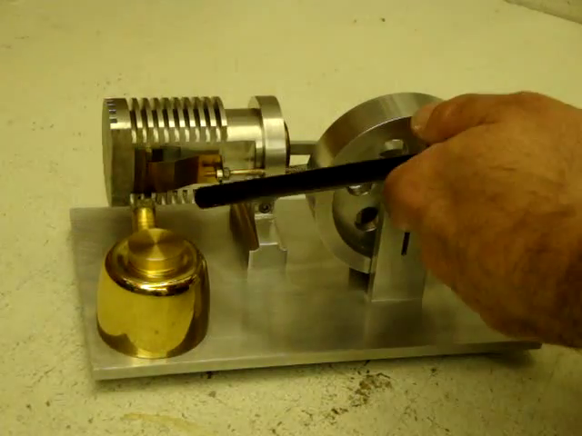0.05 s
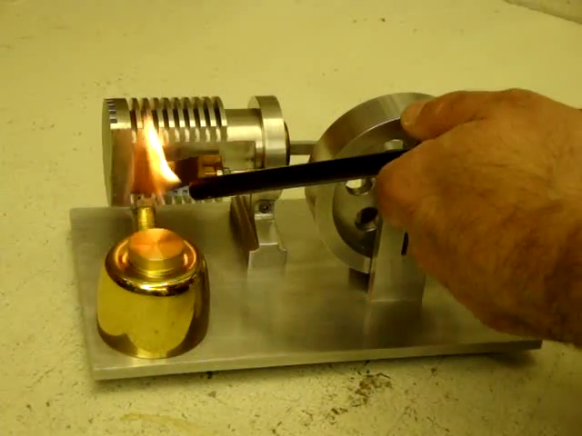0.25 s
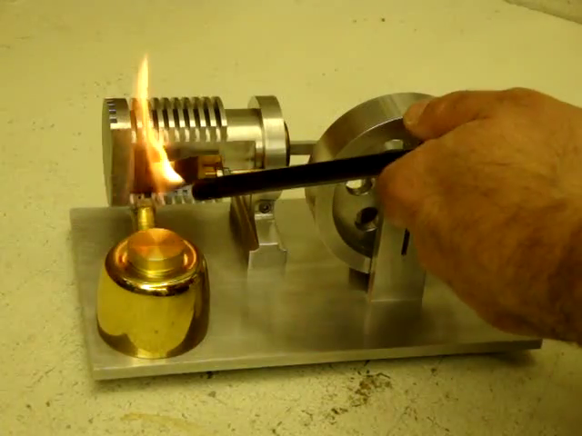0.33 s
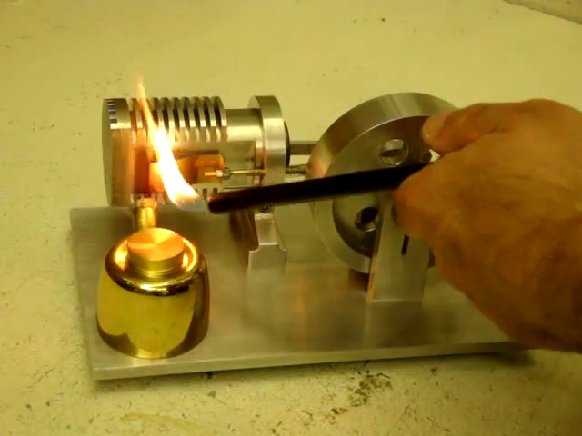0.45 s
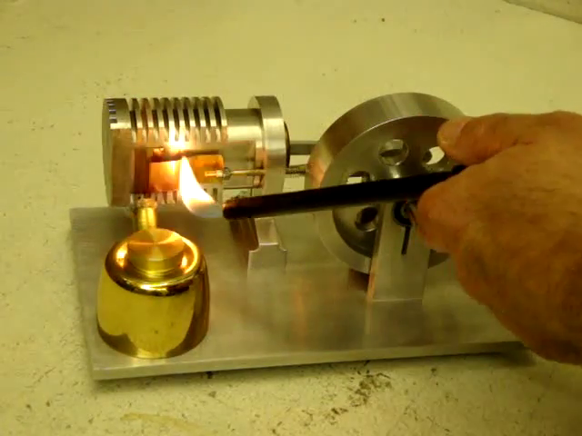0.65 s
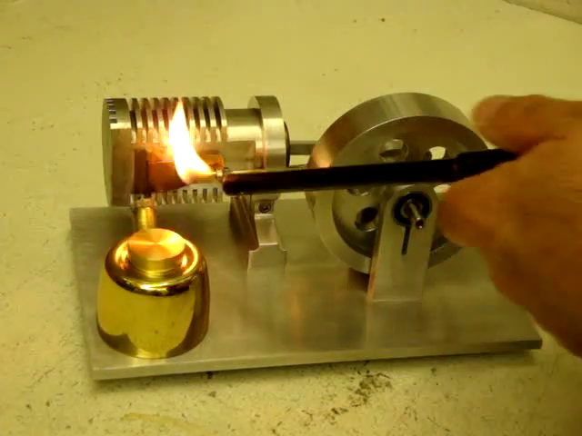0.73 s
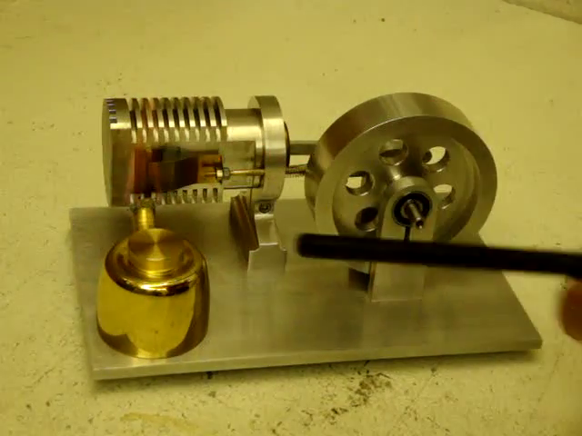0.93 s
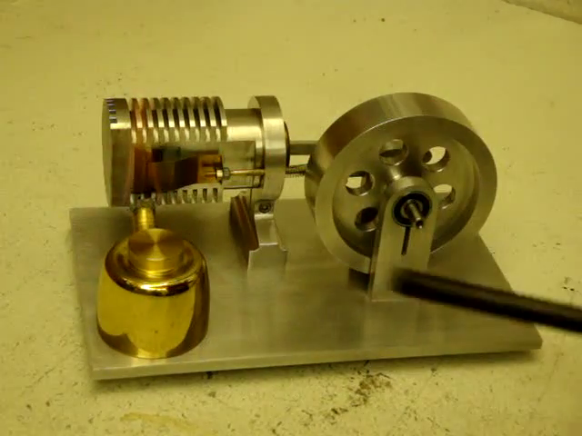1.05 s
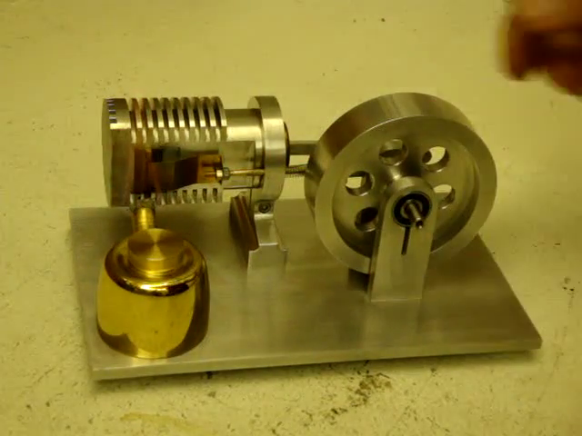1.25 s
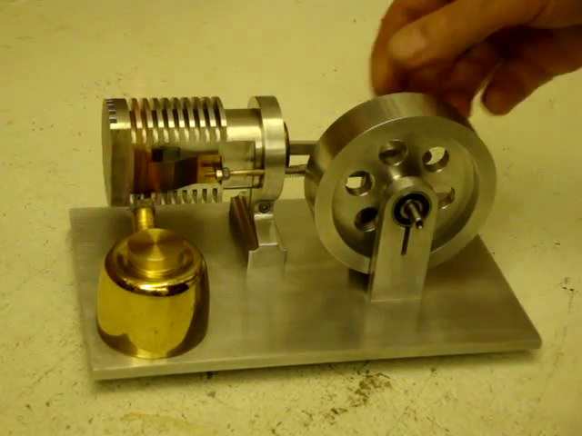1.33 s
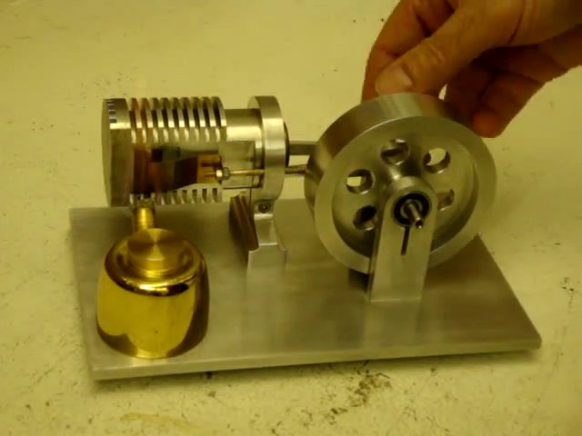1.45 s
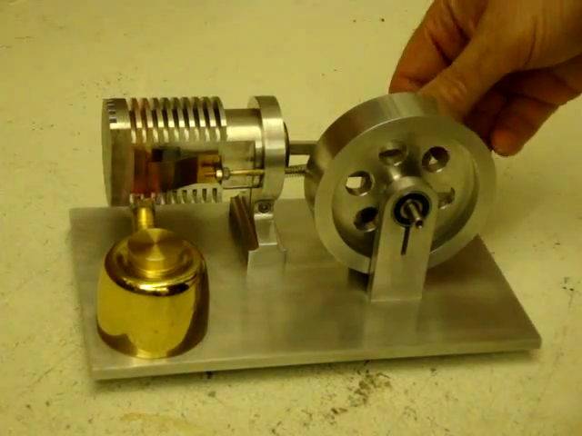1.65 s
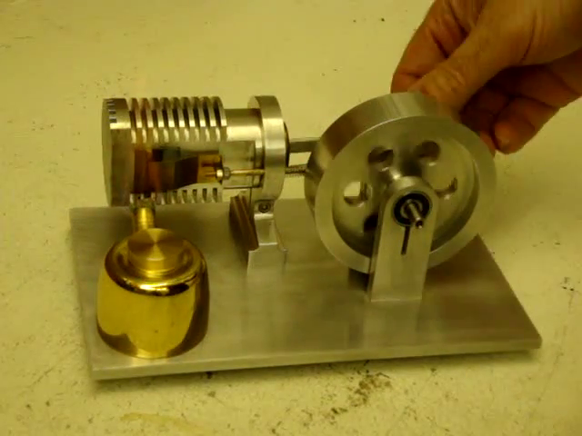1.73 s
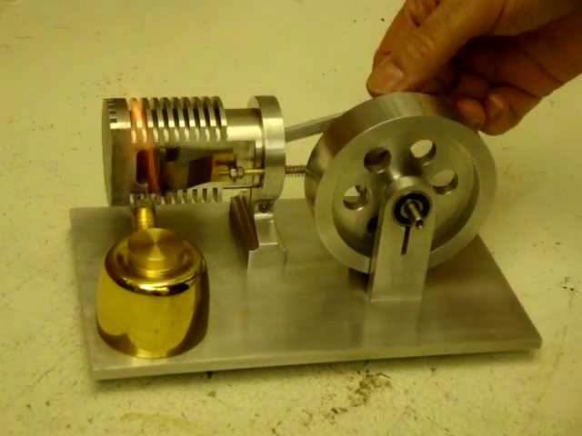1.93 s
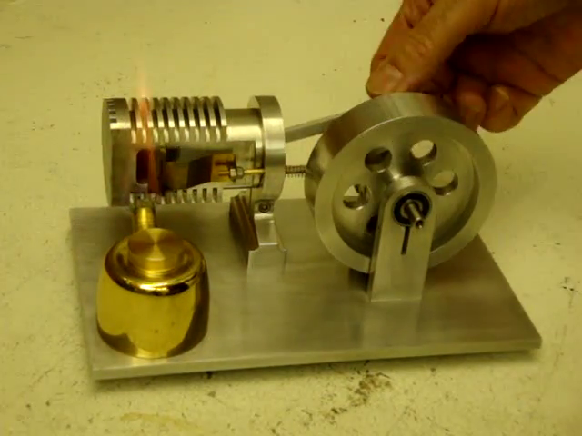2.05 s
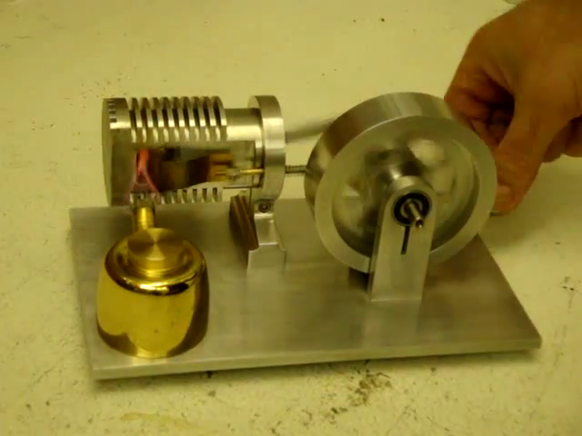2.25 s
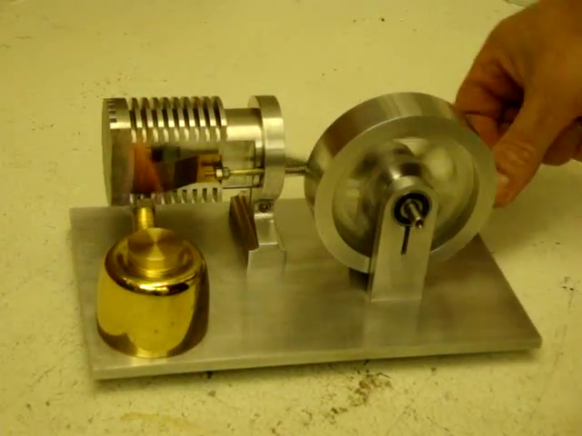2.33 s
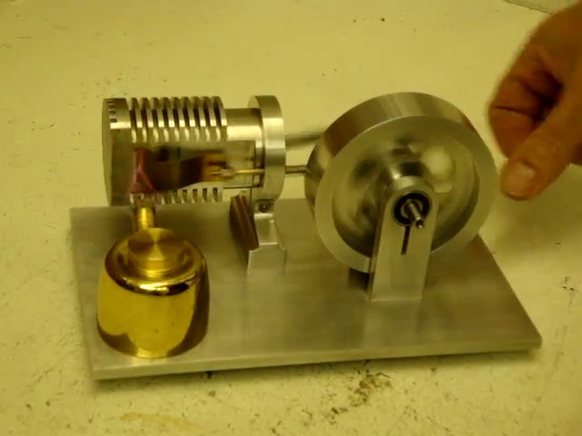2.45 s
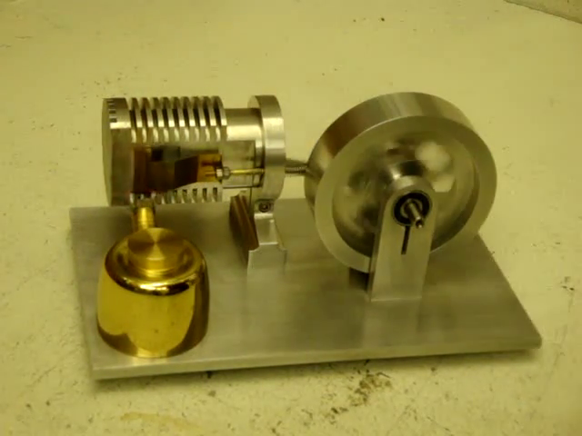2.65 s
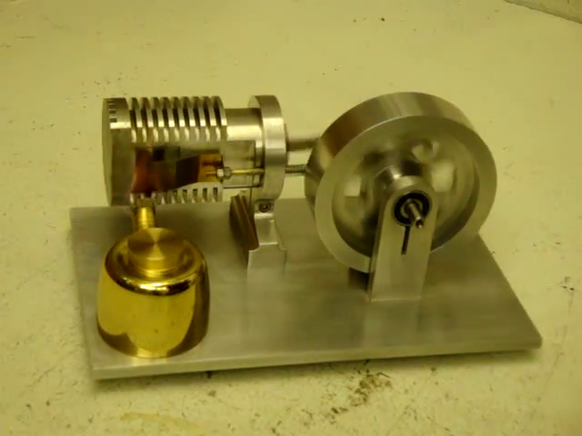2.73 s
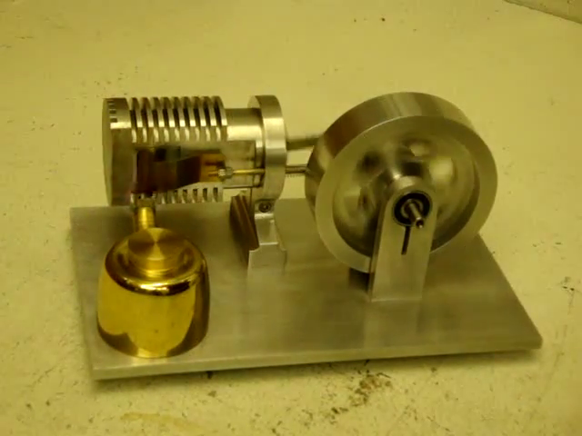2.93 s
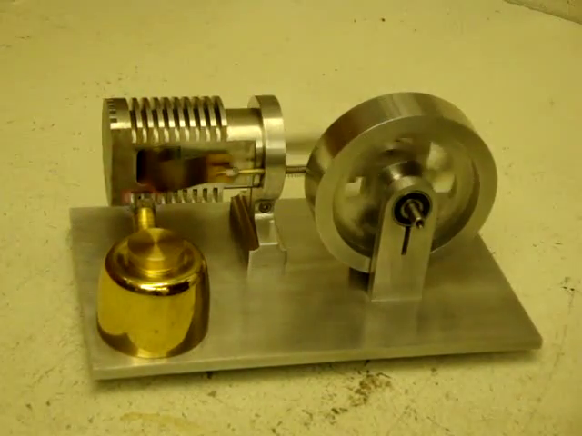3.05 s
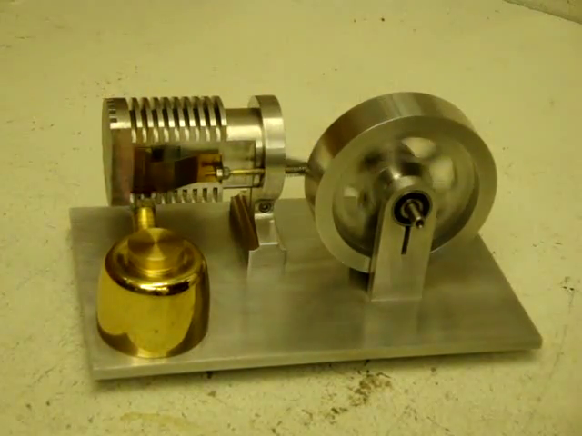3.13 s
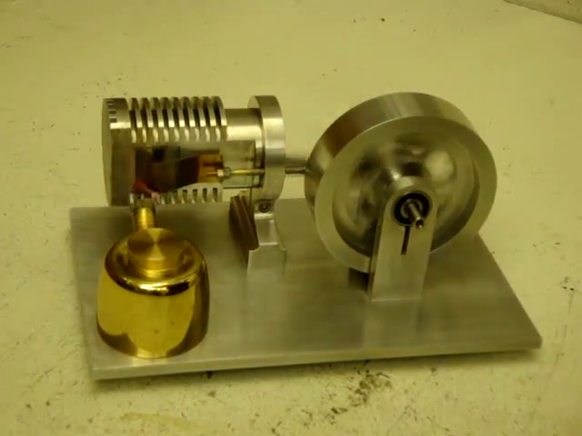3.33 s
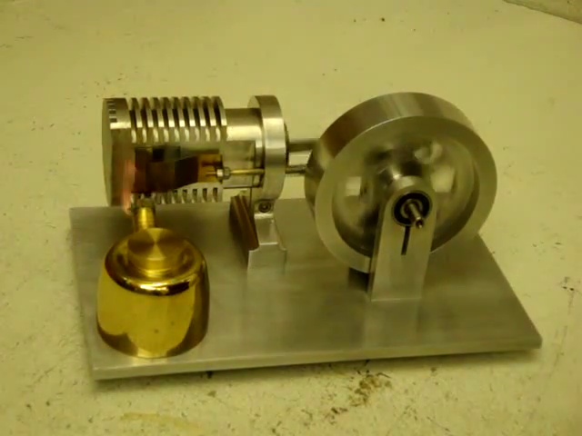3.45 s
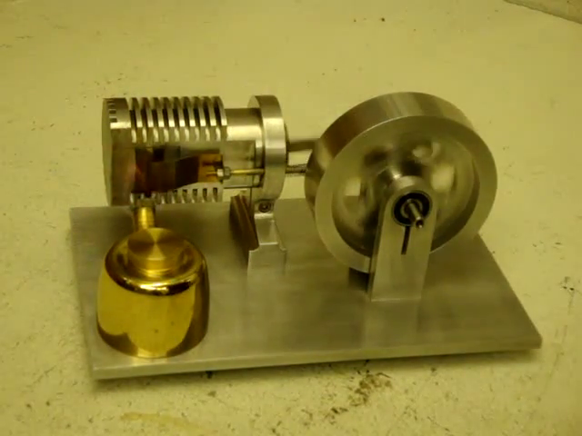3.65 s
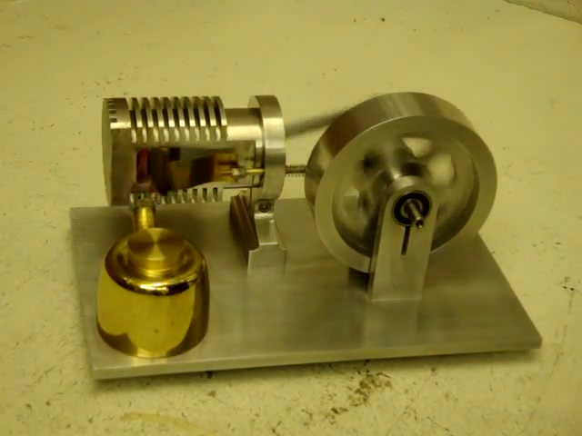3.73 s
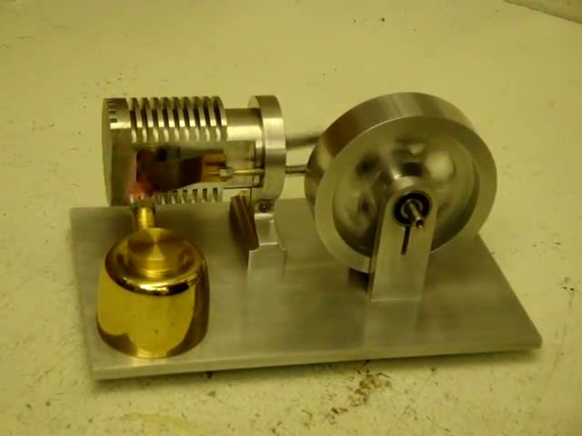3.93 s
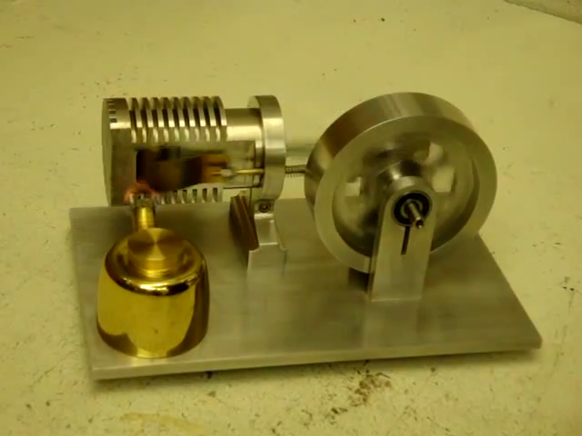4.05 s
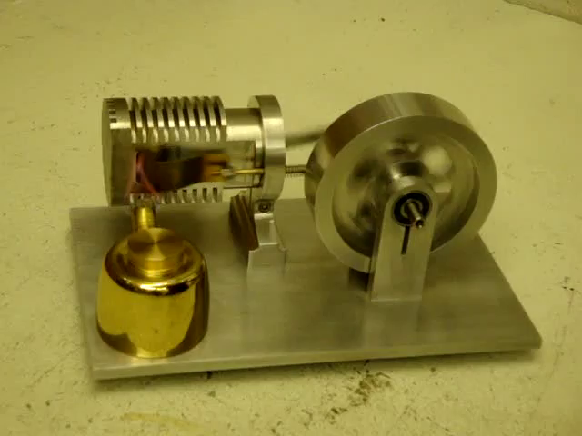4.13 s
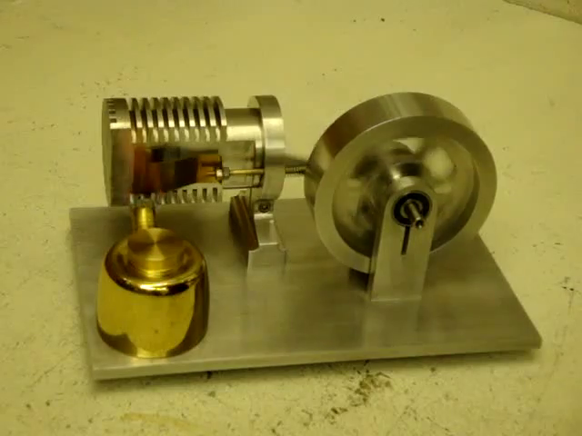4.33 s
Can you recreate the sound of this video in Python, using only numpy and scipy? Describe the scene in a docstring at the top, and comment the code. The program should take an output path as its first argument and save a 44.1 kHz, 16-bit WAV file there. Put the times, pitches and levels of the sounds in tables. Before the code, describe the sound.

In a small workshop, a lighter snaps once amid tiny clicks, then its casing rattles faintly. After a quiet gap, fingers rock a metal flywheel with small ticks and bumps, then flick it. The model engine catches and knocks quickly and steadily, about six times a second, with slides and ticks between knocks. Close mono microphone, dry room, soft treble limit.

```python
"""On a workbench in a small workshop, a lighter snaps and lights the burner of a flame-licker model engine.
Fingers rock the flywheel and flick it; the engine catches and runs at nearly six turns a second.
Every turn plays one chain: valve knock, spring ring, piston slide, linkage ticks, return stroke.
Each contact is a burst of metallic micro-impacts sent through the resonances of the part it strikes.
Quiet room noise and a faint steady hum lie underneath."""
import sys
import numpy as np
from scipy import signal
from scipy.fft import rfft, irfft
from scipy.io import wavfile
from scipy.ndimage import uniform_filter1d

SR = 44100
rng = np.random.default_rng(int(sys.argv[2]) if len(sys.argv) > 2 else 0)


def file_out(sig):
    """Save sig as 16-bit WAV at sys.argv[1]."""
    # one column per channel
    cols = np.atleast_2d(sig).T
    # limit, then scale
    lim = np.clip(cols, -1, 1)
    pcm = np.round(lim * 32767).astype(np.int16)
    wavfile.write(sys.argv[1], SR, pcm)


N = 277830

# quiet workshop air, spectrum shape: (frequency [Hz], relative density [dB per Hz])
AIR_SPECTRUM = [(15, -76.5), (25, -24), (92, -20), (172, -19), (200, -15), (257, -16), (339, -12),
                (458, -12.5), (588, -13), (701, -13), (996, -11), (1100, -16), (10000, -20.5), (13000, -69),
                (22000, -120)]
# faint steady hum: (frequency [Hz], level [dB])
HUM_TONES = [(602, -66.5)]

# trigger, igniter and release of the lighter: (time [s], drive [dB], decay [s])
LIGHTER_CLICKS = [(.062, -37, 0.006), (.069, -35, 0.0051), (.0995, -16, 0.03), (.113, -20, 0.05),
                  (.126, -22.5, 0.027), (.496, -45, 0.0098), (.759, -33.5, 0.0025), (.784, -43.5, 0.0082),
                  (.81, -43, 0.012), (.843, -45.5, 0.025)]
# the lighter's casing rubbing and rattling as it is drawn back: (time [s], drive [dB], decay [s])
CASING_RATTLES = [(.503, -53, 0.011), (.72, -58, 0.072), (.768, -52, 0.16), (.852, -47, 0.014),
                  (.8635, -31, 0.024), (.876, -33.5, 0.019), (.981, -51, 0.027), (.999, -49.5, 0.02)]
# the valve gear clicking as fingers move the wheel: (time [s], drive [dB], decay [s])
GEAR_CLICKS = [(1.773, -44.5, 0.0078), (1.792, -52, 0.003), (1.808, -30.5, 0.0079), (1.824, -44, 0.037),
               (2.200, -33, 0.0034), (2.224, -30, 0.041), (2.282, -47, .003)]
# the flywheel's stand groaning as the wheel is rocked: (time [s], drive [dB], decay [s])
STAND_GROANS = [(1.815, -53.5, .03)]
# fingers bumping the engine on the bench: (time [s], drive [dB], decay [s])
BENCH_BUMPS = [(1.43, -59, 0.051), (1.78, -45.5, 0.0077), (2.187, -30.5, 0.019), (2.245, -51, 0.04),
               (2.355, -47, 0.0063)]
# loose metal parts knocking together: (time [s], drive [dB], decay [s])
LOOSE_CLACKS = [(1.7925, -34, 0.0037), (2.520, -29.5, 0.036), (3.022, -31.5, 0.0088),
                (3.223, -29.5, 0.0051), (4.4342, -14.5, 0.0086), (4.446, -24, 0.02), (4.466, -23.5, 0.03),
                (5.2785, -23.5, 0.0056)]
# fingers roll the flywheel twice, then flick it: (time [s], bearing drive [dB], rise [s], decay [s])
WHEEL_NUDGES = [(1.40, -51.5, 0.053, .05), (1.77, -45.5, 0.027, 0.11), (2.113, -36.5, 0.065, 0.17)]
# the valve knocks shut once a flywheel turn: (time [s], strength [dB])
VALVE_KNOCKS = [(2.184, -14.5), (2.354, -13), (2.511, -10.5), (2.667, -14), (2.835, -14), (3.012, -13),
                (3.181, -13), (3.361, -13), (3.536, -14), (3.704, -14.5), (3.874, -14.5), (4.05, -13),
                (4.22, -12.5), (4.39, -11), (4.567, -13), (4.738, -12.5), (4.911, -14), (5.087, -13),
                (5.273, -10.5), (5.44, -13), (5.612, -15.5), (5.798, -13), (5.967, -13.5), (6.144, -12)]

# resonances of each part: (frequency [Hz], width [Hz], relative level [dB])
LIGHTER_MODES = [(390, 390, -25.5), (1550, 45, -2), (1640, 34, -12), (1770, 34, -4), (1810, 470, -2.5),
                 (1988, 34, 5.5), (2100, 34, -1.5), (2420, 67, -6.5), (2860, 58, 1.5), (3080, 710, -6),
                 (3700, 130, -2.5), (4180, 370, -6.5), (5300, 810, -10.5), (5850, 130, -7),
                 (6940, 1900, -13.5), (9040, 1300, -17.5)]
CASING_MODES = [(1370, 150, -1), (1940, 610, -1), (2369, 62, -4), (2821, 535, -9), (3600, 1500, -6),
                (4701, 2797, -21), (6940, 2000, -13.5)]
GEAR_MODES = [(890, 430, 5.5), (2500, 1600, -2.5), (4350, 1300, 6.5), (6180, 710, 8), (8100, 1900, 1.5)]
STAND_MODES = [(270, 19, 0), (381, 20, -1), (900, 60, -10), (1407, 44, -6), (3530, 46, -10)]
BENCH_MODES = [(92, 29, -2), (178, 38, -2), (346, 113, -4.5)]
FRAME_MODES = [(573, 420, -4.5), (920, 160, -2), (1120, 70, -2), (1540, 250, -3), (1890, 580, -6),
               (2680, 330, -2), (3360, 860, -5.5), (4650, 500, -12), (6412, 250, -21), (8416, 2300, -15)]
BEARING_MODES = [(308, 195, -1.5), (917, 290, 3), (1197, 170, 8.5), (1474, 320, 12.5), (1696, 450, 2),
                 (2500, 1060, 8), (3057, 47, 13), (3810, 170, 8.5), (4300, 870, 2.5), (6170, 130, -7.5)]
VALVE_MODES = [(407, 158, -7), (836, 250, -14), (1500, 700, -11.5), (2090, 97, -2), (2420, 290, -1),
               (2907, 72, 0.5), (3520, 920, -10), (4700, 300, -7), (5970, 330, -13.5), (7000, 2900, -15.5),
               (9400, 880, -18)]
SPRING_MODES = [(339, 270, -13), (540, 79, -9), (865, 280, -18), (1391, 59, -6.5), (2353, 990, -15),
                (2860, 43, -6), (3552, 26, 9.5), (4630, 780, -8.5), (7351, 3200, -15), (8580, 390, -4),
                (9730, 69, 0.5), (9348, 2800, -27.5)]
PISTON_MODES = [(418, 154, -13), (869, 2200, -11.5), (1463, 230, -3), (2236, 92, -1.5), (2560, 49, 2),
                (2840, 610, -6.5), (3520, 18, 0.5), (4626, 315, -3.5), (6380, 490, -8.5), (5620, 37, -4.5),
                (8300, 2400, -11.5), (9410, 290, -5.5)]
ROD_PIN_MODES = [(377, 351, -38), (1431, 632, -45), (1750, 61, -4.5), (2340, 340, -12), (2860, 57, 2),
                 (3750, 780, -12), (4680, 420, -2), (6644, 780, -10.5), (9455, 270, -3.5)]
CRANK_PIN_MODES = [(367, 351, -27.5), (1532, 750, -17.5), (2310, 400, 18.5), (2925, 121, -1),
                   (3623, 610, -6), (4800, 890, 18), (5500, 86, 12), (6220, 180, 22), (7800, 650, 12),
                   (9329, 501, -39)]
PUSH_ROD_MODES = [(329, 315, -41), (796, 110, -0.5), (1380, 480, -2.5), (1423, 75, 3.5), (2450, 180, -4),
                  (2820, 1200, -6), (3437, 43, 2.5), (4780, 610, -7), (6370, 140, 0.5), (7979, 2100, -12)]
# the base plate ringing on the bench: (frequency [Hz], width [Hz], relative level [dB])
PLATE_MODES = [(82, 51, -26), (167.8, 25, -7), (218.4, 25, -7), (254, 13.5, -7.5), (341.7, 32, -0.5),
               (380.6, 40, -0.5), (407, 27, -3.5), (440.4, 11, 2.5), (524, 13, -1), (616, 30, -2.5),
               (672, 24, 0.5), (803, 75, 0), (842, 8.3, -4.5), (900, 92, -3.5), (1170, 25.6, -3.5),
               (1414, 16, -11.5)]

AIR_DB = -55.5  # RMS level of the room noise
TOP_HZ = 10050  # treble limit of the microphone
TIME = np.arange(N) / SR  # s
SPAN = TIME[:8192]  # s, the time axis of one contact
# drive of valve and base plate, relative to the knock's strength (dB)
VALVE_DB, THUD_DB = -12, 11
# the first knock is softer by this much (dB); the flame takes over with this time constant (s)
COLD_DB, CATCH_S = 4, 0.08
# base drive of the sliding parts and of the linkage ticks (dB), offset for each part
STROKE_DB, TICK_DB = -30.5, -36.5
# crank angle of each contact (share of a turn after the knock)
PISTON_AT, SLACK_AT, ROD_AT, CRANK_AT, PUSH_AT = 0.165, 0.41, 0.503, 0.63, 0.695
# bearings under power: drive at the start (dB) and its fall as they run in (dB per s)
RUN_DB, RUN_IN_DB_PER_S = -43, 1.12


def undb(db):
    """Decibels to gain."""
    return 10 ** (np.asarray(db) / 20)


def add(track, s, sound):
    """Mix a short sound in at a time in seconds."""
    start = max(int(s * SR), 0)
    part = track[start:start + len(sound)]
    part += sound[:len(part)]


def ring(force, modes, size=8192):
    """Pass a force through a part's resonances: a minimum-phase response of unit energy."""
    f = np.maximum(np.fft.rfftfreq(size, 1 / SR), 1)
    power = 0
    for hz, width, db in modes:
        detuning = (f * f - hz * hz) / (f * width)
        power = power + undb(db) ** 2 / (1 + detuning ** 2 / 2) ** 2
    # folding the cepstrum forward in time makes the response causal
    cepstrum = irfft(np.log(power + 1e-12) / 2)
    cepstrum[1:size // 2] *= 2
    cepstrum[size // 2 + 1:] = 0
    response = irfft(np.exp(rfft(cepstrum)))
    return signal.fftconvolve(force, response / np.linalg.norm(response))[:N]


def grit(count, rough_db):
    """Micro-impacts of metal on metal, their strength changing about every millisecond."""
    swell = uniform_filter1d(rng.standard_normal(count), size=49) * np.sqrt(49)
    force = rng.standard_normal(count) * undb(rough_db * swell)
    return force / np.std(force)


def contact(rise, hold, decay):
    """Force envelope of one contact: it builds, stays, and dies away (all in s)."""
    build = np.minimum(SPAN / max(rise, 1 / SR), 1)
    return build * np.exp(-np.maximum(SPAN - rise - hold, 0) / decay)


def chatter(envelope, rough_db, count=3):
    """A burst of micro-impacts under an envelope that drives all frequencies about equally."""
    force = grit(len(SPAN), rough_db) * envelope
    for _ in range(count):
        flat = irfft(np.exp(1j * np.angle(rfft(force))))
        force = flat * np.sqrt(envelope)
    return force * np.linalg.norm(envelope) / np.linalg.norm(force)


def blows(events, modes, rise, hold, rough_db):
    """Single blows on one part, each with its own strength and decay."""
    force = np.zeros(N)
    for s, db, decay in events:
        add(force, s, undb(db) * chatter(contact(rise, hold, decay), rough_db))
    return ring(force, modes)


def strokes(times, levels_db, modes, rise, hold, decay, alike, jitter, rough_db, scatter_db=0.5):
    """One contact a turn; the same surfaces meet each time, so a share of the chatter repeats."""
    envelope = contact(rise, hold, decay)
    habit = chatter(envelope, rough_db)
    force = np.zeros(N)
    late, harder = rng.standard_normal((len(times), 2)).T
    for s, db in zip(times + jitter * late, levels_db + scatter_db * harder):
        fresh = chatter(envelope, rough_db)
        burst = np.sqrt(alike) * habit + np.sqrt(1 - alike) * fresh
        add(force, s, undb(db) * burst)
    return ring(force, modes)


def air():
    """Even room noise, filtered to the spectrum of the air, with a faint steady hum."""
    hz, db = np.transpose(AIR_SPECTRUM)
    f = np.maximum(np.fft.rfftfreq(N, 1 / SR), 1)
    shape = undb(np.interp(np.log(f), np.log(hz), db))
    noise = irfft(rfft(rng.standard_normal(N)) * shape, N)
    hum = np.zeros(N)
    for line_hz, line_db in HUM_TONES:
        hum += np.sqrt(2) * undb(line_db) * np.sin(2 * np.pi * line_hz * TIME)
    return undb(AIR_DB) * noise / np.std(noise) + hum


def room(sound, wet_db, t60, first_s):
    """Dense short reflections from the bench and nearby walls: decaying noise after a first gap."""
    t = TIME[:SR // 2]
    tail = rng.standard_normal(len(t)) * np.exp(-np.log(1000) * t / t60) * (t > first_s)
    return sound + undb(wet_db) * signal.fftconvolve(sound, tail / np.linalg.norm(tail))[:N]


def lighter(snap_s=0.0994, snap_db=5.0, snap_width=0.00006):
    """The igniter's hammer snaps once, amid the clicks and casing rattle of the lighter."""
    # a sharp pressure spike with a shallow rebound
    spike = 0.17 * np.exp(-SPAN / 0.00032) - np.exp(-SPAN / snap_width)
    snap = np.zeros(N)
    add(snap, snap_s, undb(snap_db) * spike)
    clicks = blows(LIGHTER_CLICKS, LIGHTER_MODES, rise=0.00048, hold=0.0017, rough_db=3.0)
    rattles = blows(CASING_RATTLES, CASING_MODES, rise=0.00065, hold=0.0064, rough_db=-1)
    return snap + clicks + rattles


def hand():
    """Fingers nudge the flywheel: the gear clicks, the stand groans and the bench thuds."""
    clicks = blows(GEAR_CLICKS, GEAR_MODES, rise=0.00078, hold=0.0049, rough_db=2)
    groan = blows(STAND_GROANS, STAND_MODES, rise=0.0092, hold=0.11, rough_db=0.0)
    bumps = blows(BENCH_BUMPS, BENCH_MODES, rise=0.0017, hold=0.0056, rough_db=4.0)
    return clicks + groan + bumps


def rolling(start_s):
    """Drive of the bearings: each nudge swells and coasts out, then the engine keeps them going."""
    by_hand = np.zeros(N)
    for s, db, rise, decay in WHEEL_NUDGES:
        swell = np.clip((TIME - s) / rise, 0, 1)
        coast = np.exp(-np.maximum(TIME - s - rise, 0) / decay)
        by_hand += undb(db) * swell * coast
    running = np.maximum(TIME - start_s, 0)
    catching = 1 - np.exp(-running / CATCH_S)
    return by_hand + catching * undb(RUN_DB - RUN_IN_DB_PER_S * running)


def disperse(force, hz, q):
    """Bending waves spread a push over a few milliseconds: an all-pass."""
    b, a = signal.iirpeak(hz, q, fs=SR)
    return force - 2 * signal.lfilter(b, a, force)


def plate(times, levels_db, rumble):
    """Valve knocks give the base plate short pushes of one shape; the bearings keep it murmuring."""
    force = np.zeros(N)
    for s, db in zip(times, levels_db):
        add(force, s, undb(db)[None])
    push = disperse(disperse(force, hz=445, q=1.5), hz=780, q=2.5)
    return ring(push + rumble, PLATE_MODES)


def engine():
    """The chain of contacts in each turn, each at its own crank angle, over the rolling bearings."""
    s, strength_db = np.transpose(VALVE_KNOCKS)
    turn = np.append(np.diff(s), np.median(np.diff(s)))
    knock_db = strength_db - COLD_DB * np.exp(-(s - s[0]) / CATCH_S)
    valve = strokes(s, knock_db + VALVE_DB, VALVE_MODES, rise=0.0023, hold=0.003, decay=0.012,
                    alike=0.31, jitter=0, rough_db=2.5)
    # the valve rebounds and sets its spring ringing
    rebound = strokes(s + 0.0079, STROKE_DB + 0.5, GEAR_MODES, rise=0.0013, hold=0.0022, decay=0.0015,
                      alike=0.24, jitter=0.0011, rough_db=5.0, scatter_db=1.5)
    spring = strokes(s + 0.012, STROKE_DB + 1.67, SPRING_MODES, rise=0.00055, hold=0.01, decay=0.024,
                     alike=0.21, jitter=0.0004, rough_db=2.0, scatter_db=0.8)
    piston = strokes(s + PISTON_AT * turn, STROKE_DB + 1.5, PISTON_MODES, rise=0.0012, hold=0.02, decay=0.02,
                     alike=0.22, jitter=0.001, rough_db=2.5, scatter_db=1.1)
    # the load reverses at dead centre: both pins cross their play and tick
    slack = strokes(s + SLACK_AT * turn, STROKE_DB - 6.5, CRANK_PIN_MODES, rise=0.0033, hold=0.0046,
                    decay=0.0055, alike=0.1, jitter=0.0014, rough_db=1.5)
    rod = strokes(s + ROD_AT * turn, TICK_DB + 4.0, ROD_PIN_MODES, rise=0.00094, hold=0.0063, decay=0.0024,
                  alike=0.29, jitter=0.00071, rough_db=2.0, scatter_db=-0.3)
    crank = strokes(s + CRANK_AT * turn, TICK_DB + 2.0, CRANK_PIN_MODES, rise=0.0012, hold=0.0039,
                    decay=0.0046, alike=0.31, jitter=0.00061, rough_db=3.5, scatter_db=0.5)
    # the push rod rubs as it carries the valve back
    push = strokes(s + PUSH_AT * turn, STROKE_DB - 5.5, PUSH_ROD_MODES, rise=0.0025, hold=0.006,
                   decay=0.0089, alike=0.22, jitter=0.00092, rough_db=2.0)
    rumble = grit(N, rough_db=2.0) * rolling(s[0])
    bearings = ring(rumble, BEARING_MODES)
    thud = plate(s + 0.0014, knock_db + THUD_DB, undb(-9.0) * rumble)
    clacks = blows(LOOSE_CLACKS, FRAME_MODES, rise=0.00054, hold=0.0014, rough_db=2.5)
    linkage = slack + rod + crank + push
    return thud + valve + rebound + spring + piston + linkage + bearings + clacks


def uneven(sound, depth_db, full_hz, size=256):
    """Random gains by moment and band make the rattle clumpy, most strongly in the treble."""
    f, _, cells = signal.stft(sound, SR, nperseg=size)
    chance = uniform_filter1d(rng.standard_normal(cells.shape), size=4, axis=0)
    depth = depth_db * np.minimum(f / full_hz, 1)[:, None]  # deepens up to full_hz
    gain = undb(depth * np.tanh(chance / np.std(chance)))
    gain /= np.sqrt(np.mean(gain ** 2, axis=1, keepdims=True))
    return signal.istft(cells * gain, SR, nperseg=size)[1][:N]


def scene():
    """Lighter, hand and engine close by in a small workshop."""
    background = air()
    flame_lighting = room(lighter(), wet_db=-15.5, t60=0.25, first_s=0.0086)
    machine = room(hand() + engine(), wet_db=-9.5, t60=0.085, first_s=0.004)
    machine = uneven(machine, depth_db=10.0, full_hz=6000)
    return (background + flame_lighting + machine)[None]


def record(dry):
    """A small mono microphone with a steep treble limit: an elliptic low-pass."""
    treble_limit = signal.ellip(12, 0.2, 70, TOP_HZ, fs=SR, output="sos")
    return signal.sosfilt(treble_limit, dry)


dry = scene()
out = record(dry)
file_out(out)
```